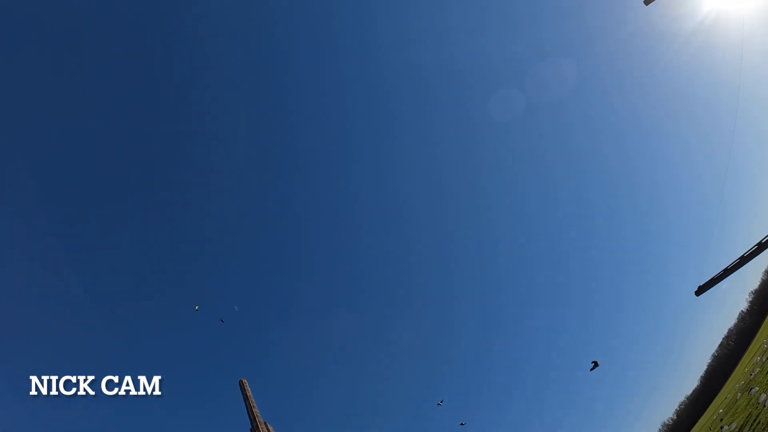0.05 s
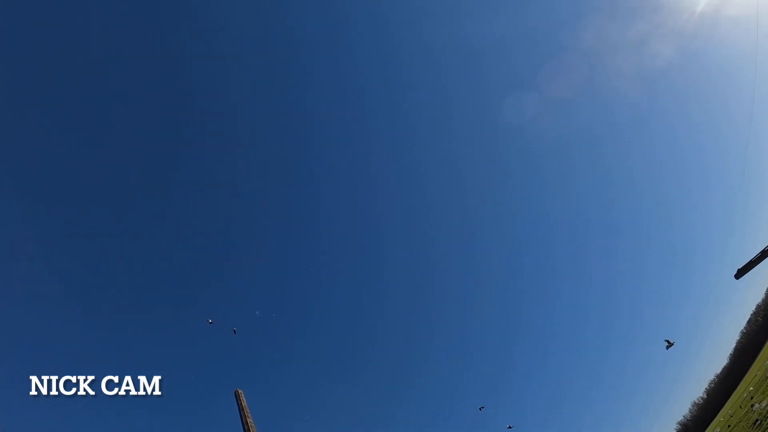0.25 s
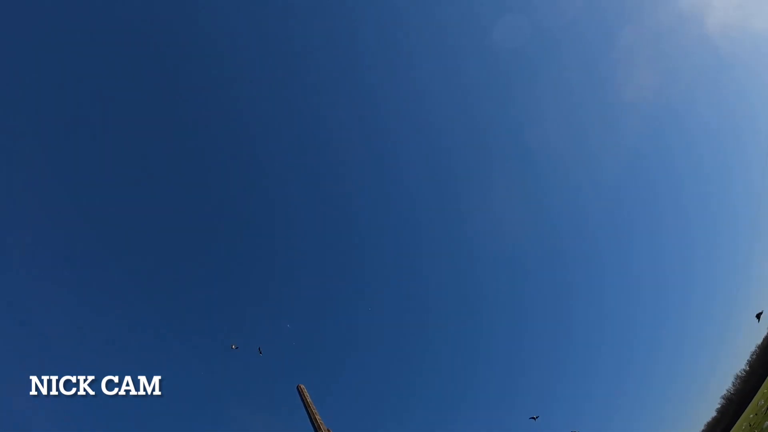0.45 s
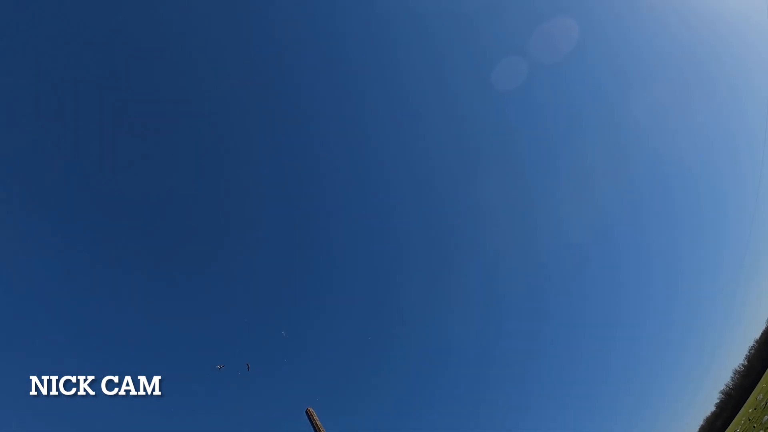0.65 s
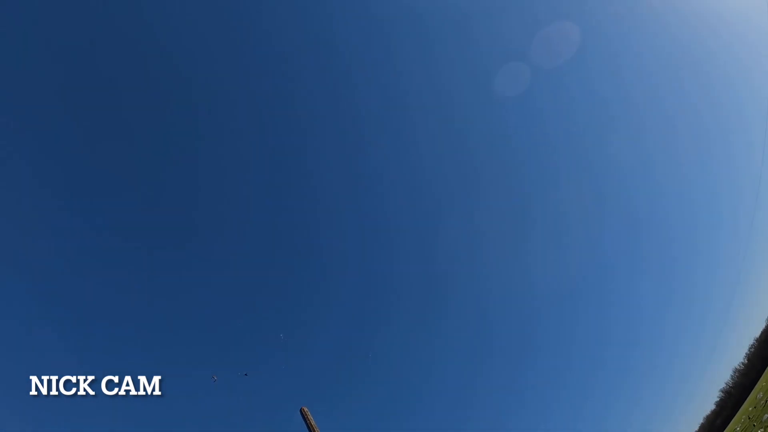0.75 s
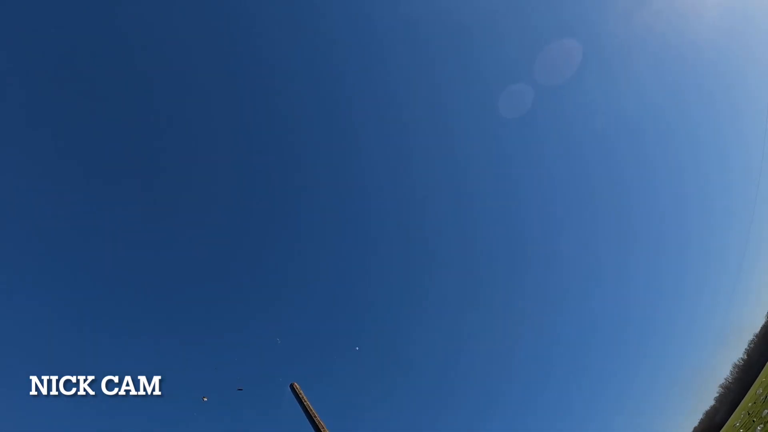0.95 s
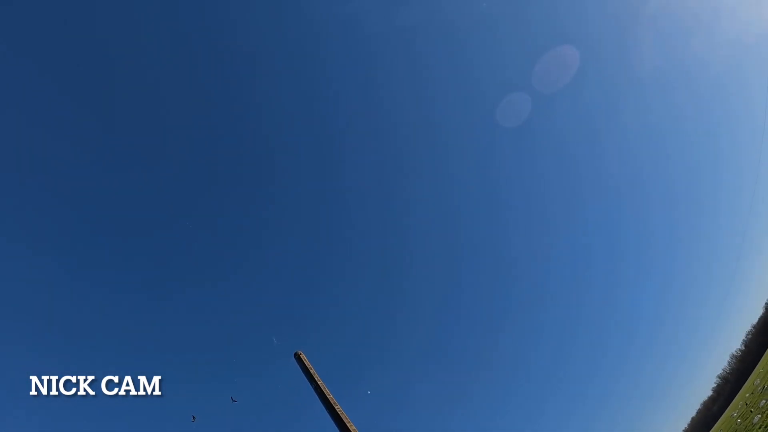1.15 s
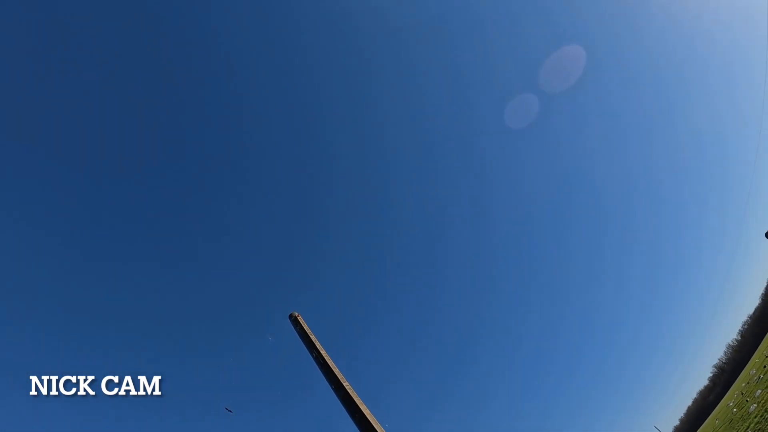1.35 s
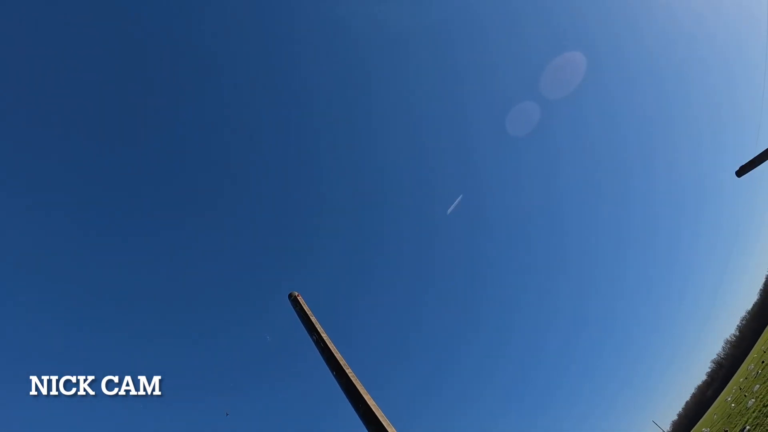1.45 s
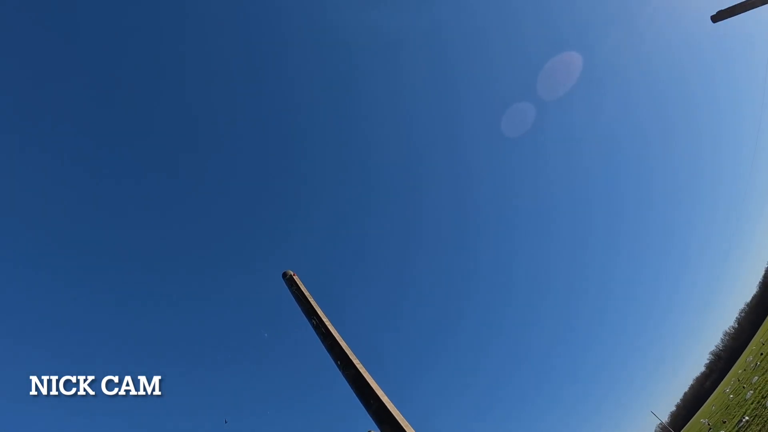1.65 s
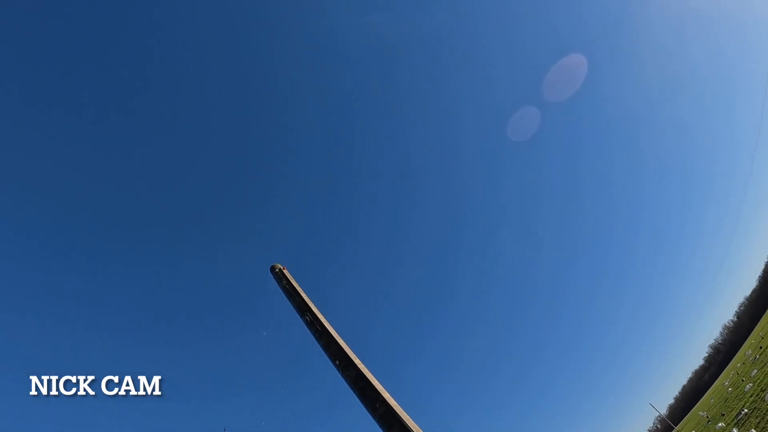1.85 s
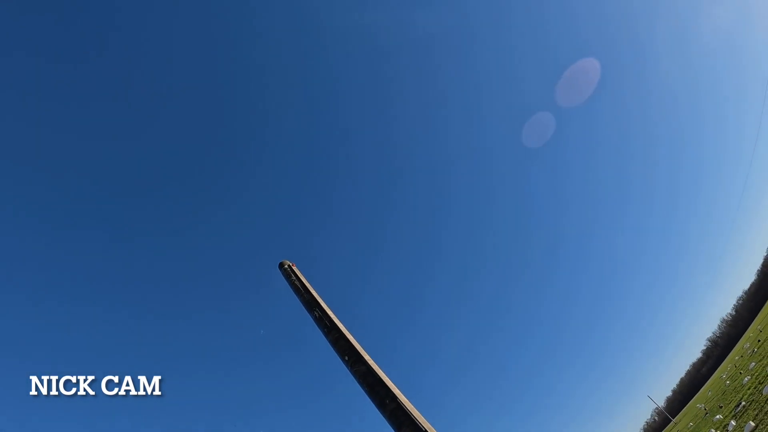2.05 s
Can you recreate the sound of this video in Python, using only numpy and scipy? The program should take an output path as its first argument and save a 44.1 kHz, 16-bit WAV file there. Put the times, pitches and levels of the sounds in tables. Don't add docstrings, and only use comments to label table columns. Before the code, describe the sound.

Close shotgun blasts, sixteen or so in under two seconds, come in uneven bursts with faint metallic action clacks between them, short field reflections and light wind, squashed by a small camera microphone outdoors.

```python
import sys
import numpy as np
from scipy import signal
from scipy.fft import rfft, irfft, next_fast_len
from scipy.io import wavfile
from scipy.ndimage import uniform_filter1d, map_coordinates

SR = 44100
rng = np.random.default_rng(int(sys.argv[2]) if len(sys.argv) > 2 else 0)


def volts_from_decibels(level):
    exponent = np.asarray(level, float) / 20
    return 10 ** exponent


def persist_wave(psi):
    counts = np.round(np.clip(psi, -1, 1) * 32767).astype(np.int16)
    wavfile.write(sys.argv[1], SR, np.atleast_2d(counts).T)


N = 92610

# start in seconds, blast level in dB, ground delay in ms, crack level in dB, tail level in dB.
VOLLEY = [(-.04, -40, 6, -60, -30.5), (0.2451, -6.5, 7, -3, -23.5), (0.2736, -5, 5.4, -6.5, -33),
          (0.2874, -10.5, 5.9, -12, -30), (0.4182, -9.5, 9.5, -2.5, -22.5), (0.4756, -4.5, 3.4, -19, -35),
          (0.5699, -8, 3.02, -34, -32.5), (.6418, -4, 4.64, -6.5, -26.5), (0.6602, -8, 9.9, -8.5, -26.5),
          (0.9241, -4.5, 5.36, -8.5, -27.5), (1.0228, -5, 9, -1, -24), (1.1428, -5, 6.14, -13.5, -24.5),
          (1.1701, -7.5, 5.5, -14.5, -31), (1.253, -3, 4.5, -11, -28), (1.5964, -4, 6.5, -7, -23.5),
          (1.7515, -3.5, 2.64, -44, -32), (1.812, -4, 4.95, -14, -27)]
# frequency in Hz, level in dB.
CRACK_SPECTRUM = [(300, 2), (1000, -2), (3500, -6), (8000, -18.5), (11000, -29.5), (13000, -33.5),
                  (15500, -44)]
# start in seconds, level in dB, 60 dB decay time in seconds.
ACTION_CLACKS = [(0.436, -16, 0.062), (0.783, -27, 0.051), (1.119, -23, 0.15), (1.61, -22.5, 0.056)]
# frequency in Hz, level in dB.
FIELD_SPECTRUM = [(40, 14), (200, -5.5), (1000, 4), (3500, -13), (8000, -30), (11000, -41.5),
                  (15500, -42.5)]
# frequency in Hz, 60 dB decay time in seconds.
FIELD_T60 = [(100, 0.26), (1000, 0.063), (10000, 0.11)]
# frequency in Hz, level in dB.
TREES_SPECTRUM = [(40, -41), (200, -28), (1000, -15), (3500, -23.5), (8000, -36), (11000, -43.5),
                  (15500, -77)]
# frequency in Hz, 60 dB decay time in seconds.
TREES_T60 = [(100, 1), (1000, 0.84), (4000, 0.52), (12000, 0.43)]
# frequency in Hz, level in dB.
WIND_SPECTRUM = [(15, -23), (25, 1.5), (184, -11), (435, -21), (758, -19), (1880, -38.5), (2080, -33),
                 (10500, -61), (13600, -103), (22000, -120)]
# time in seconds, level in dB.
WIND_GUSTS = [
    (0, -31),
    (.1, -28),
    (.2, -34.5),
    (.55, -32.5),
    (.85, -32.5),
    (1.35, -33.5),
    (1.55, -34),
    (1.72, -31.5),
    (1.95, -36),
    (2.1, -38),
]
# shot time in seconds, lead in seconds, whistle level in dB, hiss
# level in dB.
BLAST_SWELLS = [(0.2463, 0.027, -13.5, -18), (0.2718, 0.008, -30, -13), (0.419, 0.023, -21.5, -9),
                (0.474, 0.012, -20, -19.5), (0.6423, 0.023, -17.5, -12), (0.9252, 0.026, -15.5, -15.5),
                (1.0207, 0.021, -16, -15.5), (1.1422, 0.011, -18, -18), (1.1695, 0.0094, -30, -20),
                (1.255, 0.014, -16, -19), (1.5974, 0.024, -13.5, -13.5), (1.811, 0.022, -20.5, -15.5)]
# frequency in Hz, width in Hz, level in dB.
SWELL_WHISTLES = [
    [(712, 99.6, -7), (1630, 95, -5.5), (2280, 60, -13.5), (4660, 145, -16.5), (6900, 86, -21),
     (8370, 120, -19), (9530, 89, -23.5)],
    [],
    [(1210, 130, 6.5), (5380, 186, -8), (7850, 99, -33)],
    [],
    [(598, 286, 6.5), (2540, 54, -9), (3640, 140, -8.5), (8900, 94, -18)],
    [(1662, 80, -3.5), (2505, 50, -5), (3330, 119, 0.5), (5220, 280, -16), (6680, 116, -22),
     (8200, 78, -23.5)],
    [(2500, 61, -33), (3140, 116, -9), (4570, 213, -9.5), (7200, 120, -20.5)],
    [(2625, 245, 2.5), (4440, 450, 2), (8430, 290, -12)],
    [],
    [(1915, 403, -2), (7860, 380, -13.5)],
    [(1453, 106.6, -4.5), (3140, 86, -6), (3835, 88, -10.5), (5360, 110, -9), (6930, 110, -22),
     (7200, 85, -32), (8640, 69, -23)],
    [(1405, 69, 0), (3087, 106, -0.5), (5330, 105, -12), (7130, 170, -13)],
]
# frequency in Hz, level in dB.
SWELL_SPECTRUM = [(300, 17), (1000, -3.5), (3000, -1), (7000, -12.5), (9500, -10.5), (12000, -24),
                  (15500, -55)]

BOOM_HZ, BOOM_T60, GROUND_T60 = 197.6, 0.012, 0.029
CHIRP_TURNS, CHIRP_S, FRONT_S = 0.23, 0.00054, 0.00051
SNAP, SNAP_S = 0.8, 0.0005
CLICK_HZ, CLICK_DB, CLICK_T60 = 3460, -8.5, 0.0046
THUMP_HZ, THUMP_DB, THUMP_T60, THUMP_LATE_S = 130, -1, 0.047, 0.0018
CRACK_RISE_S, CRACK_T60 = 0.0012, 0.022
FRONT_HZ, GROUND_HZ = 7000, 1170
GROUND_DB, GROUND_THUMP_DB = -2, -3.5
FIELD_RISE_S, TREES_RISE_S, TAIL_DB, PATCH_DB = 0.0022, 0.013, 21.5, 1
GUST_DB, GUST_RATE_HZ = 2.5, 25.3
SWELL_DB = 19
SWELL_OVER_S, SWELL_FADE_S = 0.004, 0.008
HISS_WIDER, HISS_BETWEEN_DB = 1.6, -13
OVERLOAD_TOP, OVERLOAD_KNEE = 0.9, 4
PORT_HZ, PORT_WIDTH_HZ, PORT_DB, RIGHT_PORT_DB = 12750, 3100, 19, -6
PORT_LAG_S, PORT_SHARED, FLUTTER_HZ = 3e-6, 0.17, 2600
LOW_CUT_HZ, BAND_HZ = 42, 15500


def unit(x):
    return x / np.sqrt(np.mean(x ** 2) + 1e-20)


def along(points, hz):
    f, v = np.transpose(points)
    return np.interp(np.log(hz + 1), np.log(f + 1), v)


def wobble(rate, size):
    return map_coordinates(rng.standard_normal(2000), [np.arange(size) * rate / SR], mode="wrap")


def filtered(x, response):
    m = next_fast_len(N + 8192)
    hz = np.fft.rfftfreq(m, 1 / SR)
    return irfft(rfft(x, m) * response(hz), m)[..., :N]


def hiss(spectrum):
    return unit(filtered(rng.standard_normal(N), lambda hz: volts_from_decibels(along(spectrum, hz))))


def since(s):
    return np.maximum(np.arange(N) / SR - s, 0)


def chirp(s, t60):
    t = np.maximum(np.arange(N) / SR - s, -FRONT_S)
    turns = BOOM_HZ * t + CHIRP_TURNS * (1 - np.exp(-t / CHIRP_S))
    front = np.clip(5 * (t / FRONT_S + 1), 0, 1)
    size = volts_from_decibels(-60 * np.abs(t) / t60) + SNAP * np.exp(-np.abs(t) / SNAP_S)
    return -np.cos(2 * np.pi * turns) * front * size


def click(s):
    t = since(s - FRONT_S)
    return np.sin(2 * np.pi * CLICK_HZ * t) * volts_from_decibels(CLICK_DB - 60 * t / CLICK_T60)


def thump(s):
    t = since(s + THUMP_LATE_S)
    return -np.sin(2 * np.pi * THUMP_HZ * t) * volts_from_decibels(THUMP_DB - 60 * t / THUMP_T60)


def dying(s, db, t60):
    t = since(s)
    return (1 - np.exp(-t / CRACK_RISE_S)) ** 2 * volts_from_decibels(db - 60 * t / t60)


def low_pass(x, corner):
    return filtered(x, lambda hz: 1 / (1 + 1j * hz / corner) ** 3)


def direct_waves():
    waves = sum(volts_from_decibels(db) * (click(s) + chirp(s, BOOM_T60) + thump(s)) for s, db, *_ in VOLLEY)
    return low_pass(waves, FRONT_HZ)


def ground_waves():
    waves = np.zeros(N)
    for s, db, delay_ms, *_ in VOLLEY:
        late = s + delay_ms / 1000
        waves += volts_from_decibels(db + GROUND_DB) * (chirp(late, GROUND_T60) + volts_from_decibels(GROUND_THUMP_DB) * thump(late))
    return low_pass(waves, GROUND_HZ)


def cracks_and_clacks():
    cracks = sum(dying(s - 0.002, db, CRACK_T60) for s, _, _, db, _ in VOLLEY)
    clacks = sum(dying(*clack) for clack in ACTION_CLACKS)
    return (cracks + clacks) * hiss(CRACK_SPECTRUM)


def tails():
    hz, t, z = signal.stft(rng.standard_normal(N), SR, nperseg=256)
    scatterers = [(FIELD_SPECTRUM, FIELD_T60, FIELD_RISE_S), (TREES_SPECTRUM, TREES_T60, TREES_RISE_S)]
    power = 0
    for s, *_, db in VOLLEY:
        age = np.maximum(t - s, 0)
        for colour, t60, rise in scatterers:
            level_db = db + along(colour, hz)[:, None] - 60 * age / along(t60, hz)[:, None]
            power = power + (volts_from_decibels(level_db) * (1 - np.exp(-age / rise))) ** 2
    patches = uniform_filter1d(rng.standard_normal(z.shape), size=5, axis=0)
    patches = uniform_filter1d(patches, size=5, axis=1)
    shaped = z * np.sqrt(power) * volts_from_decibels(PATCH_DB * unit(patches))
    return volts_from_decibels(TAIL_DB) * signal.istft(shaped, SR, nperseg=256)[1][:N]


def wind():
    gust_db = np.interp(np.arange(N) / SR, *np.transpose(WIND_GUSTS))
    return volts_from_decibels(gust_db + GUST_DB * wobble(GUST_RATE_HZ, size=N)) * hiss(WIND_SPECTRUM)


def scene():
    blasts = direct_waves() + ground_waves() + cracks_and_clacks()
    return np.tile(blasts + tails() + wind(), (2, 1))


def rising_swells():
    out, noise = np.zeros(N), hiss(SWELL_SPECTRUM)
    t = np.arange(-2000, 0) / SR
    f = np.fft.rfftfreq(len(t), 1 / SR)
    partials = [(0, 2), (-1.32, -4), (-1.7, -1), (3.5, -9)]
    for (s, lead, db, hiss_db), lines in zip(BLAST_SWELLS, SWELL_WHISTLES):
        end = round((s + SWELL_OVER_S) * SR)
        onset = np.clip((t / lead + 1.46) * 3, 0, 1)
        swell = volts_from_decibels(SWELL_DB * t / lead) * onset * np.clip(-t / SWELL_FADE_S, 0, 1)
        tones, near = 0, volts_from_decibels(HISS_BETWEEN_DB)
        for hz, width, level in lines:
            near = near + 1 / (1 + ((f - hz) / (HISS_WIDER * width)) ** 2)
            for apart, part_db in partials:
                turns = (hz + apart * width) * t + rng.random()
                tones = tones + volts_from_decibels(level + part_db) * np.sin(2 * np.pi * turns)
        rough = unit(irfft(rfft(noise[end - len(t):end]) * near, len(t)))
        out[end - len(t):end] += swell * (volts_from_decibels(db) * tones + volts_from_decibels(hiss_db) * rough)
    return out


def overload(x):
    return x / (1 + np.abs(x / OVERLOAD_TOP) ** OVERLOAD_KNEE) ** (1 / OVERLOAD_KNEE)


def port_ring(x):
    def port(f):
        loss = 1j * f * PORT_WIDTH_HZ
        return (loss / (PORT_HZ ** 2 - f * f + loss)) ** 3

    flutter = PORT_SHARED + np.array([unit(wobble(FLUTTER_HZ, size=N)) for _ in range(2)])
    return filtered(filtered(x, port) * flutter, port) * volts_from_decibels([[PORT_DB], [PORT_DB + RIGHT_PORT_DB]])


def top_cut(x):
    return signal.sosfilt(signal.butter(12, 15730, fs=SR, output="sos"), x)


def record(dry):
    x = overload(dry) + rising_swells()
    sides = np.array([[1], [-1]])
    x = filtered(x, lambda f: np.exp(1j * np.pi * f * PORT_LAG_S * sides))
    x = x + port_ring(x)
    x = filtered(x, lambda f: 1j * f / (LOW_CUT_HZ + 1j * f) / (1 + (f / BAND_HZ) ** 40))
    return top_cut(x)


dry = scene()
out = record(dry)
persist_wave(out)
```